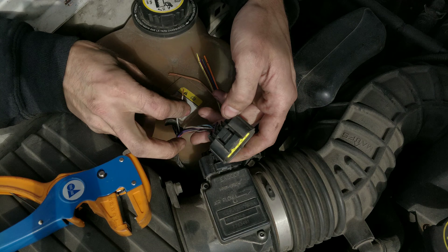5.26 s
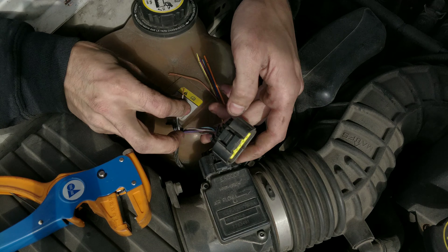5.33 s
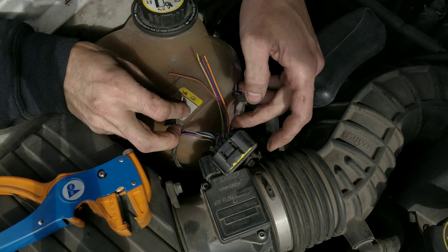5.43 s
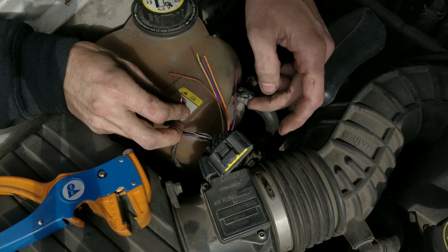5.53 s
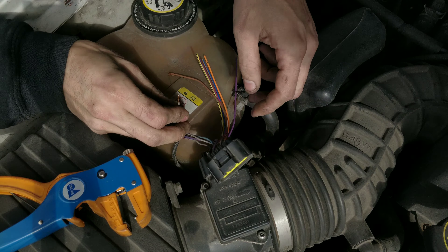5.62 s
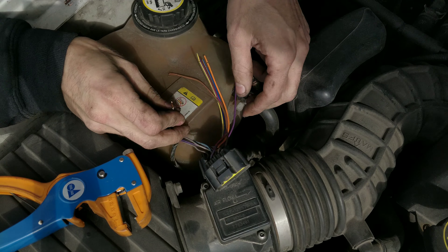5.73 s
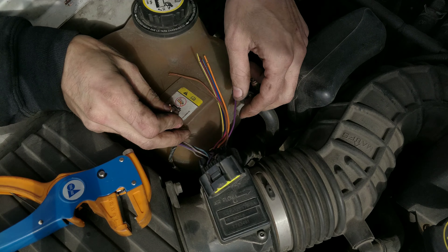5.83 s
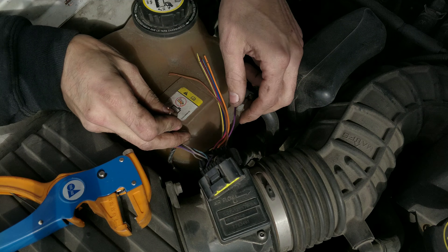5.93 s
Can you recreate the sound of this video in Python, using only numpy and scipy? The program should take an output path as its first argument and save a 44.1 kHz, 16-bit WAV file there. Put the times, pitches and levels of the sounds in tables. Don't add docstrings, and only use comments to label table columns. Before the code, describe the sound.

Close wire cutting: small ticks, a hard metallic snap, a ringing second bite and a bouncing plastic clatter, then finger rustles over distant engine hum.

```python
import sys
import numpy as np
from scipy import signal
from scipy.io import wavfile

SR = 44100
rng = np.random.default_rng(int(sys.argv[2]) if len(sys.argv) > 2 else 0)


def to_wav(sig):
    pcm = np.clip(np.atleast_2d(sig), -1, 1) * 32767
    pcm = np.round(pcm).astype(np.int16)
    wavfile.write(sys.argv[1], SR, pcm.T)


def attenuation_scalar(level_db):
    decades = np.asarray(level_db, float) / 20
    return 10 ** decades


N = 263277


def rms_one(x):
    return x / np.sqrt(np.mean(x ** 2) + 1e-20)


def in_time(rows):
    s, *columns = np.transpose(rows)
    return [np.interp(np.arange(N) / SR, s, column) for column in columns]


def at_hz(points, hz):
    point_hz, value = np.transpose(points)
    return np.interp(np.log(hz), np.log(point_hz), value)


def drift(rate_hz):
    r = np.exp(-80 * np.pi * rate_hz / SR)
    chance = rng.standard_normal(N // 40 + 2002)
    slow = signal.lfilter([1], [1, -2 * r, r * r], chance)[2000:]
    return np.interp(np.arange(N) / 40, np.arange(len(slow)), rms_one(slow))


def band(x, low_hz, high_hz, order=2):
    edges_hz = [low_hz, min(high_hz, 0.45 * SR)]
    return signal.sosfilt(signal.butter(order, edges_hz, "band", fs=SR, output="sos"), x)


def struck(times, blow_db, modes, spread_db):
    at = np.round(np.array(times) * SR).astype(int)
    out = np.zeros(N)
    luck = rng.standard_normal((len(at), len(modes)))
    for k, (hz, level_db, t60) in enumerate(modes):
        clicks = np.full(N, 1e-18)
        clicks[at] = attenuation_scalar(blow_db + level_db + spread_db * luck[:, k]) * (-1) ** (k + 1)
        r = attenuation_scalar(-60 / (max(t60, 0.004) * SR))
        w = 2 * np.pi * hz / SR
        out += signal.lfilter([0, np.sin(w)], [1, -2 * r * np.cos(w), r * r], clicks)
    return out


def bursts(times, level_db, t60s, low_hz, high_hz):
    noise = rms_one(band(rng.standard_normal(N), low_hz, high_hz, order=3))
    out = np.zeros(N)
    for s, db, t60 in zip(times, level_db, t60s):
        i = round(s * SR)
        t = np.arange(min(N - i, SR // 8)) / SR
        tail = attenuation_scalar(-33.5 - 60 * t / 0.02)
        fall = (1 - np.exp(-t / 0.00028)) * (attenuation_scalar(-60 * t / max(t60, 0.003)) + tail)
        out[i:i + len(t)] += attenuation_scalar(db) * fall * noise[i:i + len(t)]
    return out


def cracks(times, mid_db, top_db, t60s, low_hz):
    middle = bursts(times, mid_db, t60s, low_hz, 6200)
    return middle + bursts(times, mid_db + top_db, t60s, 10300, 22000)


def far(common, left_own, right_own):
    lag_s = 0.00029
    late = np.interp(np.arange(N) - lag_s * SR, np.arange(N), common)
    return np.array([late + left_own, common + right_own])


# time in seconds, firing tone in dB, exhaust rasp in dB.
ENGINE_LOAD = [(0, -35, -52.5), (.45, -38, -59), (.95, -41, -52), (1.38, -39.5, -54.5), (2.1, -34, -61),
               (2.5, -34.5, -58), (2.75, -38.5, -64), (3.1, -35.5, -64), (3.4, -35.5, -45.5),
               (3.75, -36, -61), (4.2, -33, -57), (4.55, -36.5, -49), (4.82, -30.5, -54),
               (5.15, -33.5, -55), (5.25, -29.5, -46), (5.6, -29.5, -46), (5.87, -29, -50.5),
               (5.97, -40, -39)]
IDLE_HZ, HZ_PER_DB, IDLE_DB = 69.3, 0.23, -35
SECOND_UNDER_RASP_DB, SECOND_FOLLOWS, RASP_WAVER_DB = -0.5, 0.87, 0.75


def engine():
    tone_db, rasp_db = in_time(ENGINE_LOAD)
    hz = IDLE_HZ + HZ_PER_DB * (tone_db - IDLE_DB)
    second_db = SECOND_FOLLOWS * rasp_db + (1 - SECOND_FOLLOWS) * (tone_db - 22) - SECOND_UNDER_RASP_DB
    second_db = second_db + RASP_WAVER_DB * drift(3.1)
    third_db = rasp_db - 0.5 + RASP_WAVER_DB * drift(5.3)
    phase = 2 * np.pi * np.cumsum(hz) / SR + 0.51 * drift(1.8)
    drone = np.zeros(N)
    for order, db in enumerate([tone_db, second_db, third_db], start=1):
        drone += attenuation_scalar(db + 2.5 + drift(10.16)) * np.sin(order * phase)
    return far(drone, 0, 0) * attenuation_scalar([[0.4], [-0.4]])


# frequency in Hz, share common to both (0 to 1).
PORT_LIKENESS = [(40, 0.93), (70, 1), (300, 0.95), (700, 0.92), (1400, .5), (3000, 0.033), (8000, 0.02)]


def far_noise(spectrum, patchy_db):
    parts = np.zeros((3, N))
    together = drift(0.31)
    edges = 18 * 2 ** np.arange(0, 10.1, 0.5)
    white = rng.standard_normal((2, 3, N))
    for k, (low, high) in enumerate(zip(edges, edges[1:])):
        hz = np.sqrt(low * high)
        if spectrum[0][0] / 1.5 < hz < spectrum[-1][0] * 1.1:
            alike = np.clip(at_hz(PORT_LIKENESS, hz), 0, 1)
            shares = np.sqrt([[alike], [1 - alike], [1 - alike]])
            gain = attenuation_scalar(at_hz(spectrum, hz) + patchy_db * (0.75 * together + drift(4.3)))
            parts += gain * band(white[k % 2], low, high) * shares
    return rms_one(far(*parts))


def hump(low_hz, high_hz, alike):
    common, left, right = band(rng.standard_normal((3, N)), low_hz, high_hz, order=3)
    return rms_one(far(alike * common, (1 - alike) * left, (1 - alike) * right))


# time in seconds, cars in dB, lorries in dB.
ROAD_LEVEL = [(0, -48.5, -41.5), (1.4, -49, -42), (2.2, -48.5, -48), (2.75, -52.5, -45.5), (3.4, -51, -45),
              (4.3, -48.5, -44.5), (4.8, -47, -42.5), (5.5, -47, -40), (5.97, -45, -38.5)]
# frequency in Hz, density in dB per Hz.
LORRY_RUMBLE = [(30, -32.5), (45, -1.5), (60, 1.5), (90, 2.5), (130, -4), (200, -10), (280, -19),
                (400, -41)]
# frequency in Hz, density in dB per Hz.
TYRE_ROAR = [(140, -23.5), (230, -4.5), (400, -10.5), (650, -5.5), (900, -9), (1200, -15), (1450, -16),
             (2100, -32.5)]
# frequency in Hz, density in dB per Hz.
AIR_HISS = [(1500, -11.5), (2200, -1.5), (3000, -1), (6000, -4.5), (9000, -5.5), (13000, -8.5), (15500, -6),
            (16500, -17)]
WHINE_DB, WHINE_FAR_DB, WHINE_GONE_S, WHINE_BACK_S, WHINE_FADE_S = -52.5, -60.5, 1.7, 4.87, 0.39
TREAD_UNDER_DB, TREAD_WAVER_DB = 9, 0.2
HISS_DB, HISS_FOLLOWS = -66, 0.4


def traffic():
    roar_db, rumble_db = in_time(ROAD_LEVEL)
    t = np.arange(N) / SR
    leaving = np.tanh((t - WHINE_GONE_S) / WHINE_FADE_S)
    coming = np.tanh((t - WHINE_BACK_S) / WHINE_FADE_S)
    low_db = WHINE_DB - 0.98 * t + (WHINE_FAR_DB - WHINE_DB) * (leaving - coming) / 2
    high_db = roar_db - TREAD_UNDER_DB + TREAD_WAVER_DB * drift(0.86)
    hiss_db = HISS_DB + HISS_FOLLOWS * (roar_db - roar_db.mean())
    out = attenuation_scalar(rumble_db) * far_noise(LORRY_RUMBLE, patchy_db=1.67)
    out += attenuation_scalar(roar_db - 0.5) * far_noise(TYRE_ROAR, patchy_db=1.17)
    out += attenuation_scalar(hiss_db) * far_noise(AIR_HISS, patchy_db=0.5)
    out += attenuation_scalar(low_db - 1.5) * hump(390, 620, alike=0.7)
    return out + attenuation_scalar(high_db) * hump(800, 958, alike=0.47)


# time of the peak in seconds, peak in dB, left over right in dB.
GUSTS = [
    (.15, -49, -10),
    (.78, -46.5, -29),
    (1.1, -41, 6),
    (1.35, -38, 5.5),
    (1.93, -45.5, 8),
    (2.8, -59.5, 8),
    (4.042, -50, 1.5),
    (5.95, -52.5, 3),
]
BREEZE_DB, GUST_S = -45.5, 0.064


def wind():
    t = np.arange(N) / SR
    sides = np.array([[0.5], [-0.5]])
    level = attenuation_scalar(BREEZE_DB)
    for s, db, pan_db in GUSTS:
        level = level + attenuation_scalar(db + pan_db * sides) * np.exp(-((t - s) / GUST_S) ** 2)
    lumps = np.array([rms_one(band(rng.standard_normal(N), 20, 63)) * attenuation_scalar(2.5 * drift(3.8)) for port in "LR"])
    shared = rms_one(band(rng.standard_normal(N), 27, 64))
    return level * (0.26 * lumps + 0.83 * shared)


# start in seconds, length in seconds, bright in dB, dull in dB.
FINGER_STROKES = [(-.1, 0.45, -65, -65.5), (.55, 0.18, -69, -70), (1.638, 0.1, -72, -78),
                  (2.0, .1, -68, -65.5), (2.294, 0.088, -66, -62), (2.37, 0.11, -62.5, -65),
                  (2.454, 0.19, -54, -50.5), (3.027, 0.14, -67, -69.5), (3.2, 0.28, -70.5, -69.5),
                  (3.899, 0.08, -61, -63), (4.018, 0.12, -63, -66.5), (4.286, 0.05, -54.5, -62.5),
                  (4.386, 0.14, -59, -63), (4.583, 0.11, -64, -75.5), (4.668, 0.16, -61.5, -63.5),
                  (4.791, 0.054, -50.5, -60.5), (4.877, 0.15, -57, -64), (5.019, 0.14, -64, -68),
                  (5.14, 0.11, -59, -66.5), (5.225, 0.15, -58.5, -60), (5.338, 0.098, -58, -61.5),
                  (5.557, 0.092, -63, -76), (5.632, 0.11, -62, -69), (5.847, 0.14, -58.5, -58.5)]


def rustle():
    t, bright, dull = np.arange(N) / SR, np.zeros(N), np.zeros(N)
    for s, length, bright_db, dull_db in FINGER_STROKES:
        i, j = max(round(s * SR), 0), min(round((s + length) * SR), N)
        stroke = np.abs(np.sin(np.pi * (t[i:j] - s) / length))
        bright[i:j] += attenuation_scalar(bright_db) * stroke
        dull[i:j] += attenuation_scalar(dull_db) * stroke
    slips_per_s = 2500
    grains = attenuation_scalar(2.3 * np.minimum(rng.exponential(1, N), 5)) * (rng.random(N) < slips_per_s / SR)
    slips = rng.standard_normal(N) * attenuation_scalar(1.9 * drift(40)) * (0.3 + grains)
    return bright * rms_one(band(slips, 11200, 14800)) + dull * rms_one(band(slips, 2700, 6200))


# time in seconds, peak in dB, top band over it in dB.
WIRE_TICKS = [(1.4984, -62, 6), (1.6557, -50, 3.5), (1.677, -60.5, -9), (1.7115, -55.5, 6),
              (1.862, -58, -12), (1.8903, -48, -5.5), (2.007, -57.5, -13), (2.0225, -42.5, -12.5),
              (2.0366, -42.5, -4), (2.0493, -32.5, -3), (2.0862, -52, -17), (2.483, -51, -7.5),
              (3.2504, -57, 5), (3.9266, -52, -10), (3.9486, -65, 15), (3.979, -53.5, 20),
              (4.0173, -55.5, 13), (4.056, -49, 11), (4.064, -56, 20), (4.2094, -57, 5),
              (4.3066, -45.5, 8.5), (4.3284, -55.5, -7.5), (4.8086, -56.5, 10.5), (4.8234, -56, 18),
              (4.8435, -51, 16.5), (5.1914, -63, 5), (5.2834, -52, -17), (5.7594, -46.5, -7.5),
              (5.8503, -34.5, -11), (5.9084, -61, -7.5)]


def ticks():
    s, db, top_db = np.transpose(WIRE_TICKS)
    return cracks(s, db + 3, top_db, np.full(len(s), 0.013), low_hz=3050)


# frequency in Hz, level in dB, t60 in seconds.
HOUSING_LOW_MODES = [(305, 0, .032), (195, -20, .15), (140, -34, .06), (250, -13, .07), (385, -8, .035),
                     (480, -19, .03)]


def housing_boom(times, blow_db):
    return struck(times, blow_db, HOUSING_LOW_MODES, spread_db=1.5)


BITE_TIMES = [1.593, 1.5985, 1.6015, 1.6062, 1.6105, 2.279, 2.2852, 2.289]
# jaws in dB, crack in dB, top band over it in dB, t60 in seconds, low jolt in dB.
BITE_BLOWS = [
    (-61, -43, -0.5, 0.0089, -55.5),
    (-51.5, -33.5, 3.5, 0.031, -45.5),
    (-30, -25.5, -5, .03, -40),
    (-6.5, -8, 1.5, 0.024, -32),
    (-23, -20, 4, 0.012, -27.5),
    (-57, -43.5, -4, 0.068, -41),
    (-57, -15.5, 4.5, 0.018, -25.5),
    (-53, -36, -2, 0.013, -45),
]
# frequency in Hz, level in dB, t60 in seconds.
JAW_MODES = [(720, -16, .02), (1300, -22, .015), (1950, -9, .018), (2250, -1, .026), (2700, -14, .015),
             (3000, -10, .018), (3250, -5, .02), (3450, 1, .028), (3680, -4, .022), (3900, -9, .02),
             (4300, -13, .025), (4900, -11, .022), (5650, -6, .015)]


def bites():
    jaw_db, crack_db, top_db, t60, jolt_db = np.transpose(BITE_BLOWS)
    out = cracks(BITE_TIMES, crack_db, top_db, t60, low_hz=2548)
    out += bursts(BITE_TIMES, jolt_db - 2.5, t60, 400, 1200)
    out += housing_boom(BITE_TIMES[3:4], -27.5)
    return out + struck(BITE_TIMES, jaw_db, JAW_MODES, spread_db=2)


# time in seconds, level in dB.
ARM_PINGS = [
    (2.2844, -29),
]
# frequency in Hz, level in dB, t60 in seconds.
ARM_MODES = [(2210, 9, .028), (2487, -14, .2), (3682, -1, .21), (3876, -4, .08), (4000, -1, .03),
             (4737, -22, .12), (5642, -20, .1), (6500, -18, .08), (7456, -24, .12)]


def steel_arms():
    return struck(*np.transpose(ARM_PINGS), ARM_MODES, spread_db=2.0)


KNOCK_TIMES = [2.5336, 2.5358, 2.5492, 2.5727, 2.5828, 2.585, 2.602, 2.626]
# low modes, upper modes, thud, crack, top of the crack over it, all in dB.
KNOCK_BLOWS = [
    (-5.5, -7, -18, -11.5, 5.5),
    (-36.5, -27, -28, -14.5, -16.5),
    (-29, -33, -58, -18, -2),
    (-11.5, -8, -19.5, -11, 1.5),
    (-20, -11, -27.5, -29, 2),
    (-24, -30.5, -35, -21, 2),
    (-26, -19, -53, -28, -1),
    (-30.5, -44, -43, -54, 0),
]
# frequency in Hz, level in dB, t60 in seconds.
HOUSING_UPPER_MODES = [(690, -2, .03), (590, -12, .04), (880, -6, .022), (1157, -9, .025), (1345, -1, .028),
                       (1600, -12, .02), (1900, -14, .025), (2450, -13, .025), (2880, -15, .025),
                       (3700, -33, .13)]


def knocks():
    low_db, up_db, thud_db, crack_db, top_db = np.transpose(KNOCK_BLOWS)
    count = len(KNOCK_TIMES)
    out = housing_boom(KNOCK_TIMES, low_db)
    out += struck(KNOCK_TIMES, up_db, HOUSING_UPPER_MODES, spread_db=1.5)
    out += bursts(KNOCK_TIMES, thud_db, np.full(count, 0.1), 180, 1000)
    return out + cracks(KNOCK_TIMES, crack_db, top_db, np.full(count, 0.022), low_hz=2066)


LAID_TIMES = [3.33, 5.763, 5.8508, 5.862, 5.905, 5.925, 5.948]
# upper modes in dB, lower modes in dB.
LAID_BLOWS = [
    (-84, -46),
    (-67, -51),
    (-35.5, -61),
    (-73, -33.5),
    (-62, -57),
    (-61, -52),
    (-56, -46),
]
# frequency in Hz, level in dB, t60 in seconds.
HANDLE_MODES = [(780, -8, .06), (1400, -1, .1), (2471, 2, .09), (3000, -14, .04), (3774, -7, .07),
                (4479, -6, .065), (4700, -9, .05), (5600, -11, .03), (6428, -6, .08)]
# time in seconds, level in dB, t60 in seconds.
GRIP_TAPS = [
    (5.763, -36, 0.017),
    (5.8506, -27.5, 0.018),
]


def laid_down():
    upper_db, lower_db = np.transpose(LAID_BLOWS)
    out = struck(LAID_TIMES, upper_db, HANDLE_MODES[2:], spread_db=1.5)
    out += struck(LAID_TIMES, lower_db, HANDLE_MODES[:2], spread_db=1.5)
    return out + bursts(*np.transpose(GRIP_TAPS), 400, 1700)


# time in seconds, level in dB.
PIVOT_SLIPS = [
    (5.367, -56),
    (5.385, -55),
    (5.418, -59),
]


def pivot_creaks():
    return struck(*np.transpose(PIVOT_SLIPS), [(3750, 0, 0.077)], spread_db=7.5)


BAY_T60_S, BAY_LEFT_DB, BAY_RIGHT_DB, BAY_LOW_HZ = 0.047, -20, -11.5, 1790


def engine_bay(x):
    t = np.arange(SR // 6) / SR
    echo = band(rng.standard_normal((2, len(t))), BAY_LOW_HZ, 5400, order=1)
    echo *= attenuation_scalar(-60 * t / BAY_T60_S) * (t > 0.002)
    echo /= np.sqrt(np.sum(echo ** 2, axis=1, keepdims=True))
    scattered = np.array([signal.fftconvolve(x, e)[:N] for e in echo])
    return attenuation_scalar([[BAY_LEFT_DB], [BAY_RIGHT_DB]]) * scattered


HOUSING_LAG_S, HOUSING_RIGHT_DB = 0.00026, 1.4
SHADOW_HZ, SHADOW_TOP_HZ, SHADOW_DB, LEAK_DB = 1300, 5100, -2.4, -26


def scene():
    distant = engine() + traffic() + wind()
    hand = rustle() + ticks() + bites() + steel_arms() + pivot_creaks()
    housing = knocks() + laid_down()
    late = np.roll(housing, round(HOUSING_LAG_S * SR))
    direct = hand + np.array([late, attenuation_scalar(HOUSING_RIGHT_DB) * housing])
    left, right = direct + engine_bay(hand + housing)
    dull = signal.sosfilt(signal.butter(1, SHADOW_HZ, fs=SR, output="sos"), right)
    dull = signal.sosfilt(signal.butter(4, SHADOW_TOP_HZ, fs=SR, output="sos"), dull)
    return np.array([left, attenuation_scalar(SHADOW_DB) * dull + attenuation_scalar(LEAK_DB) * right]) + distant


def roll_off(x):
    return signal.sosfilt(signal.butter(12, 16690, fs=SR, output="sos"), x)


PORT_DIP_HZ, PORT_DIP_WIDTH_HZ, PORT_DIP_SHARE = 8900, 2500, 0.5
CUTOFF_HZ, CEILING = 16400, 1.15


def record(dry):
    b, a = signal.iirpeak(PORT_DIP_HZ, PORT_DIP_HZ / PORT_DIP_WIDTH_HZ, fs=SR)
    coloured = dry - PORT_DIP_SHARE * signal.lfilter(b, a, dry)
    rounded = CEILING * np.tanh(coloured / CEILING)
    mix = signal.sosfilt(signal.cheby2(10, 45, CUTOFF_HZ, fs=SR, output="sos"), rounded)
    return roll_off(mix)


dry = scene()
out = record(dry)
to_wav(out)
```